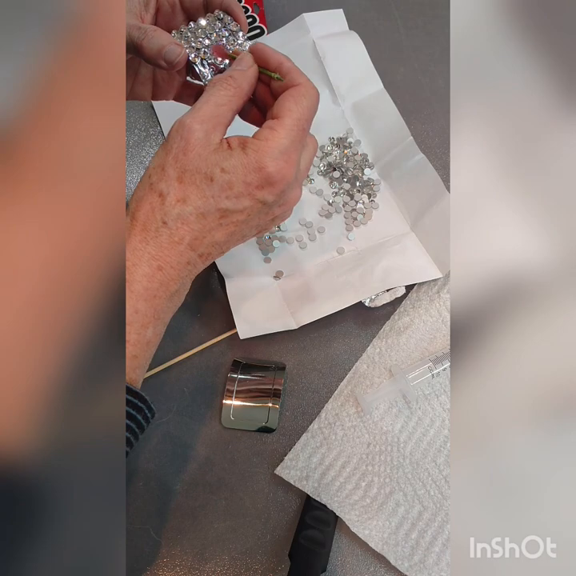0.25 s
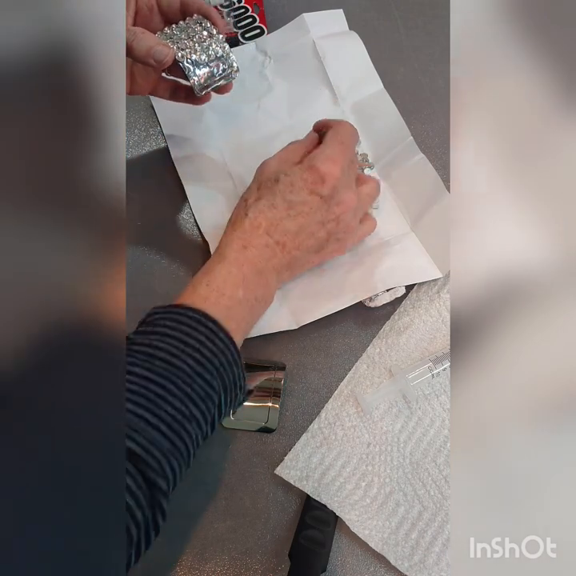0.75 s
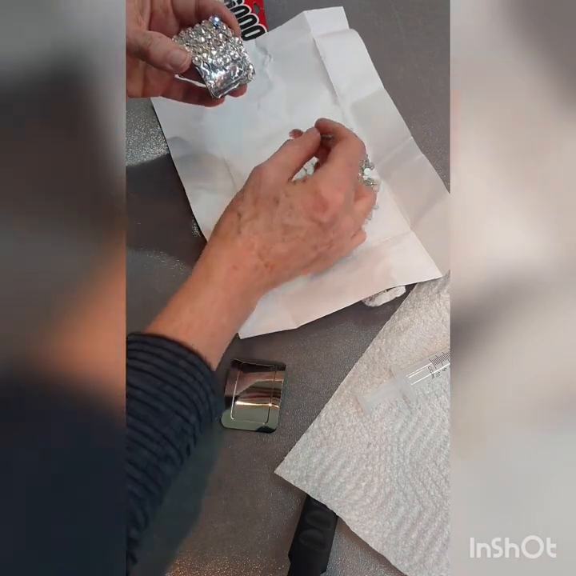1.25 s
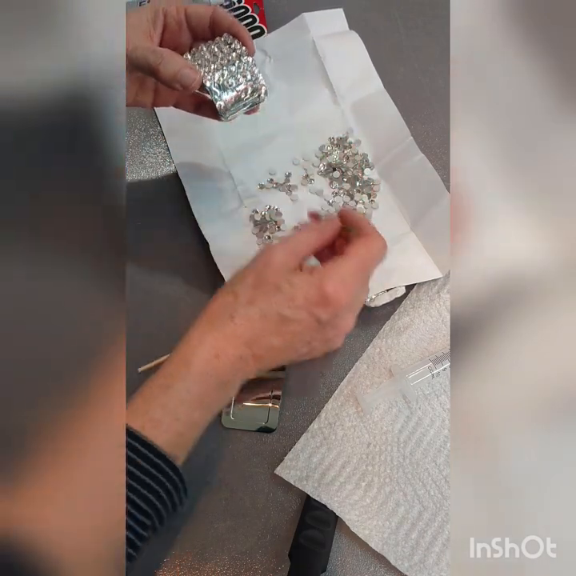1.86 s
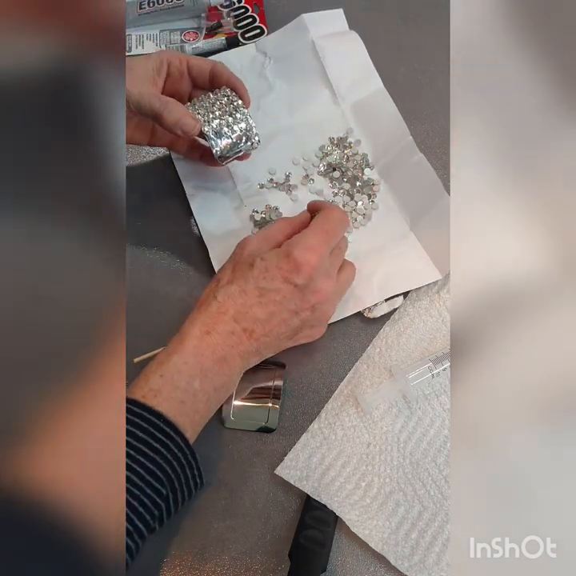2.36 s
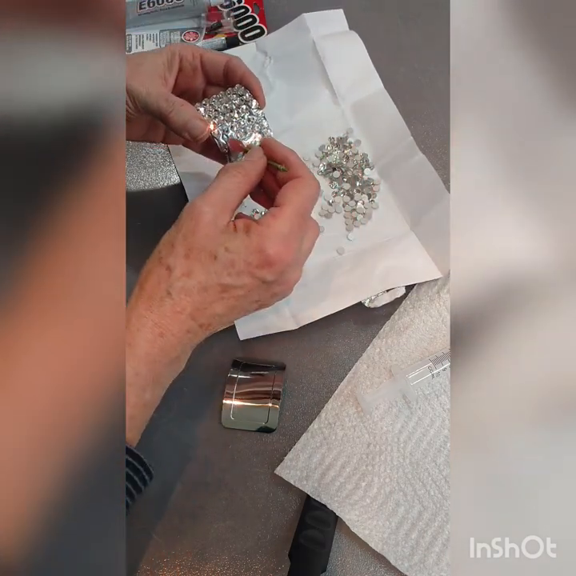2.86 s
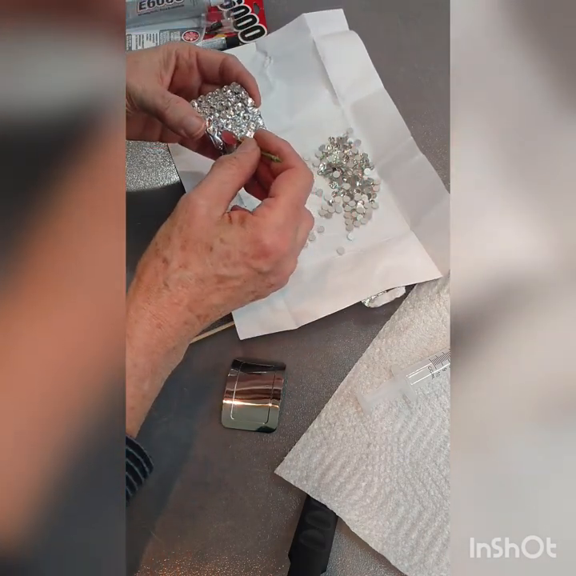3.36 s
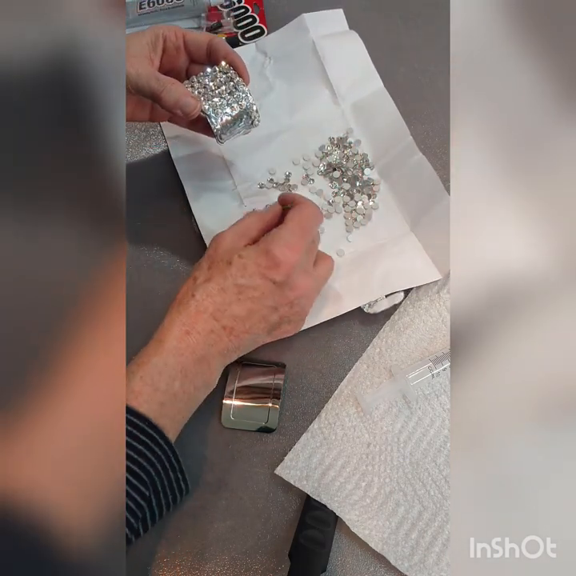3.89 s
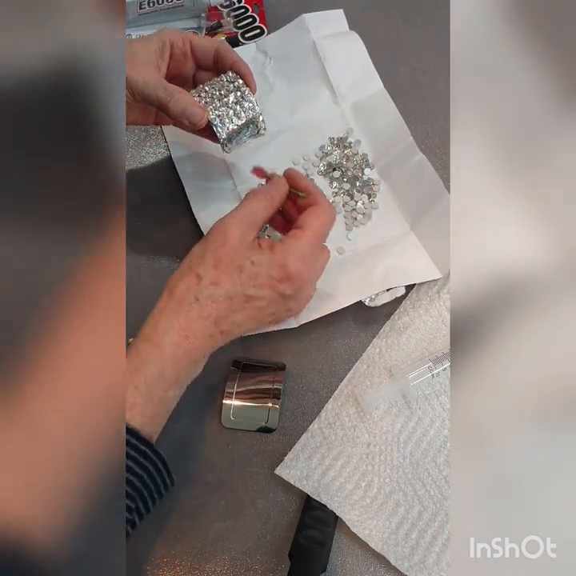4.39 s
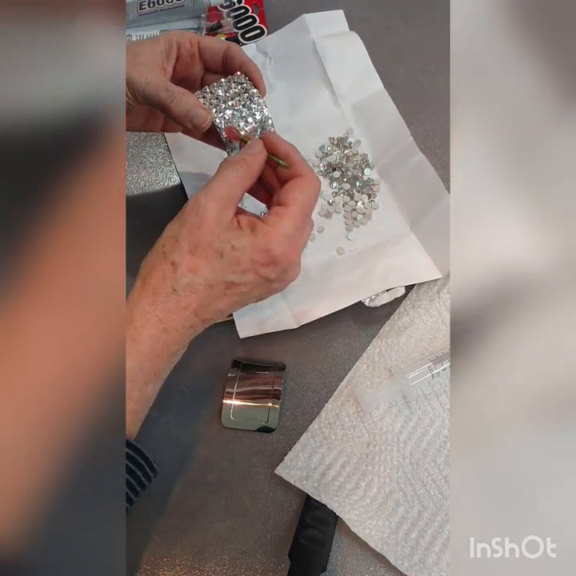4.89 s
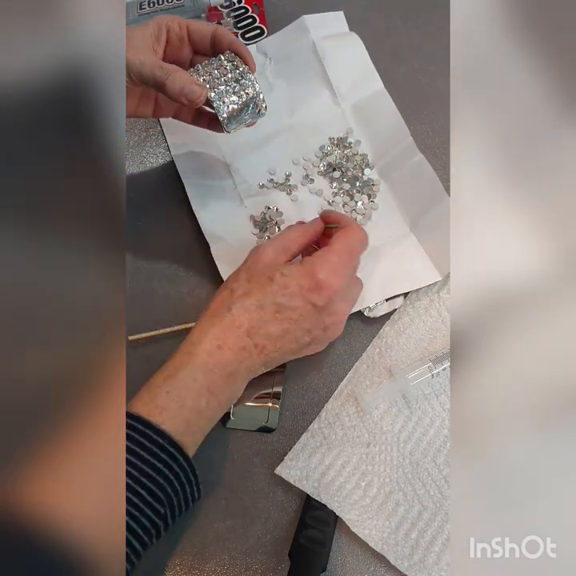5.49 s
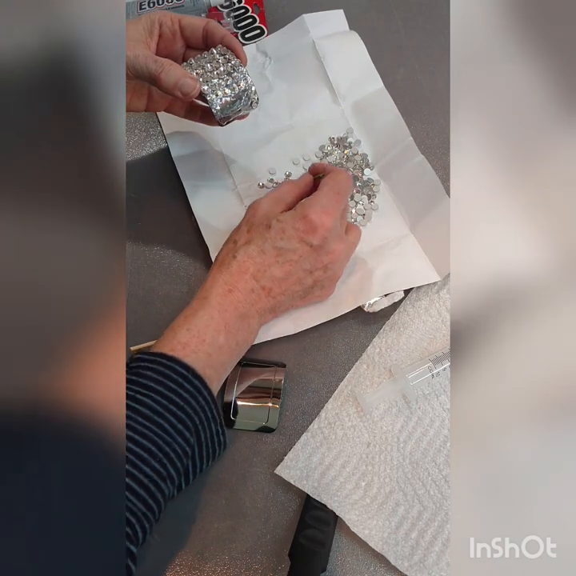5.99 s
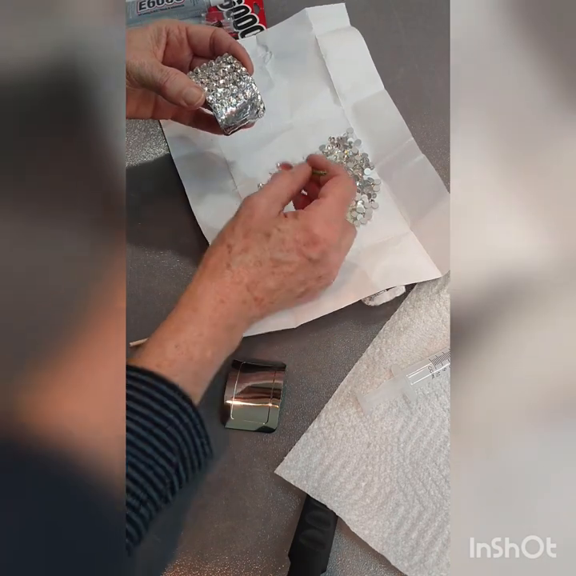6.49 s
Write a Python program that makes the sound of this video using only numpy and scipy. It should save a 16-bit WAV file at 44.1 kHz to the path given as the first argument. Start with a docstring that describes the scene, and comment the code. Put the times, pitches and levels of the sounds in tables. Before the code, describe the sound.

In a quiet room, fingers handle tiny crystals on a paper sheet: crisp clicks, papery rasps and soft thuds in three bouts between lulls.

```python
"""Fingertips pick small glass stones off a creased sheet of paper on a table, close to a phone, in a quiet room.
Throughout: noise shaped as room rumble and hiss, sine hum, and table resonances excited by the moving arm.
From 0.8 s faint ticks and a scrape; 1.5-2.6 s dense snaps and drags; then a lull with two very faint ticks.
From 3.7 s a second handling, and from 5.4 s a third: resonated noise for the sheet, brief sines for the stones.
Last, the phone widens its two capsules by taking from each a delayed copy of the other."""
import sys
import numpy as np
from scipy import signal
from scipy.fft import rfft, irfft
from scipy.io import wavfile
from scipy.ndimage import uniform_filter1d

SR = 44100
rng = np.random.default_rng(int(sys.argv[2]) if len(sys.argv) > 2 else 0)


def waveform_to_disk(signal):
    """Save audio, clipped to [-1, 1], as 16-bit WAV at the path in sys.argv[1]."""
    frames = np.transpose(np.atleast_2d(signal))
    scaled = np.clip(frames, -1, 1) * 32767
    samples = np.round(scaled).astype(np.int16)
    wavfile.write(sys.argv[1], SR, samples)


N = 297234  # samples

# relative noise spectrum of the quiet room: pitch_hz, density_db (per Hz)
ROOM_SPECTRUM = [(25, -35), (45, -6), (90, -2.5), (180, -3), (350, -8), (700, -11.5), (1300, -16.5),
                 (2500, -19.5), (5000, -21), (9000, -24.5), (12500, -29.5), (15500, -35.5)]
# mains-driven hum, mean level in each capsule: pitch_hz, level_db (rms)
HUM_TONES = [(84, -86), (120, -72.5)]
# rumble of the table under the moving arm: start_s, level_db
ARM_RUMBLE = [(0.0, -75), (0.45, -81), (1.07, -69), (1.35, -86), (2.2, -57), (3.0, -73), (3.98, -64),
              (5.14, -74), (5.56, -56), (5.72, -66), (5.9, -60.5), (6.1, -57.5), (6.21, -84), (6.36, -52),
              (6.44, -75), (6.53, -55), (6.65, -70), (6.74, -74)]
# fingers dragging over the sheet, one list for each spell of contact: start_s, level_db,
# weight_db (low body over level)
DRAGS = [
    [(0.81, -82, -3), (0.835, -61.5, -11), (0.98, -69, -13), (1.05, -63.5, 2), (1.09, -70, -10),
     (1.17, -60, -8), (1.255, -60, -11), (1.285, -74, -9)],
    [(1.5, -57, 8), (1.535, -65, -5), (1.585, -55.5, 3), (1.65, -64, 6.5), (1.69, -78, -3)],
    [(1.75, -70, 3), (1.765, -56.5, -1), (1.84, -66, 8), (1.88, -72, 5), (1.9, -61, 4), (1.96, -51, -2.5),
     (2.01, -55, -4), (2.052, -50, -2.5), (2.09, -55.5, 0.5), (2.15, -63, -0.5), (2.19, -55.5, 1),
     (2.23, -61, 2), (2.268, -45.5, -4), (2.29, -65.5, 3.5), (2.35, -64.5, 1.5), (2.385, -56.5, -6),
     (2.41, -60, 3), (2.445, -52.5, 5), (2.5, -60.5, 3.5), (2.55, -75.5, 11)],
    [(3.72, -76, 2), (3.745, -61.5, -3), (3.8, -67.5, -1), (3.82, -62.5, 2), (3.89, -62, 4),
     (3.93, -51, -3.5), (3.955, -52.5, -5), (3.975, -45, -16), (4.0, -46, -27), (4.02, -60.5, 1),
     (4.09, -60.5, 0.5), (4.113, -53, -8.5), (4.14, -58, -3), (4.195, -63.5, -4), (4.24, -52.5, -2.5),
     (4.29, -58.5, -1.5), (4.39, -57.5, -18), (4.42, -72, 9)],
    [(5.44, -80, 7), (5.485, -59, 2), (5.52, -65.5, -4), (5.56, -59.5, -3), (5.62, -58.5, -3),
     (5.68, -53, -9), (5.8, -52, -11), (5.885, -48, -13), (6.03, -49, -16.5), (6.1, -62, -8),
     (6.14, -70, 5)],
    [(6.28, -67, 2), (6.298, -46.5, -9), (6.33, -54.5, -2), (6.348, -41.5, -2), (6.39, -54, -0.5),
     (6.44, -57.5, -1), (6.5, -53, -7.5), (6.535, -55, -1.5), (6.56, -66.5, 1)],
]
# snaps of sheet and stones: start_s, peak_db, weight_db (low body), sparkle_db (glassy top),
# tail_db (tail against crack); the last three are relative
SNAPS = [(0.826, -56, -15, -13, -3), (1.0284, -52.5, -3, -8, -3), (1.118, -53, -19, -16, -9),
         (1.4625, -22.5, -5.5, -11, -5.5), (1.5462, -28.5, -9, -13, -9.5), (1.5938, -30.5, -7, -9, -4.5),
         (1.6086, -37, -4, -20, -16), (1.6278, -37.5, -4, -25, -10), (1.6645, -45, -5, -13, -10),
         (1.7666, -45, 1, -1, 2), (1.7766, -29.5, -4, -23, -9.5), (1.791, -41.5, 2, -21, 2),
         (1.8027, -33, 0.5, -10, -3), (1.8086, -37, 6, -24, -19), (1.8918, -44, 0.5, -21, -5),
         (1.9067, -41, -1, -18, -7), (1.928, -48.5, 7.5, -15, -7), (1.9456, -46.5, 6.5, -15, -5),
         (2.0034, -36, 6.5, -7, -4), (2.0576, -33, 8.5, -9, -8), (2.1578, -35, -1.5, -1, -1.5),
         (2.1977, -38.5, -15, -3, -7), (2.2368, -49.5, 8.5, -14, -3.5), (2.261, -38, -5.5, -7, -1),
         (2.3252, -54, -1, -14, -18), (2.417, -46, 2, -14, -11), (2.4211, -25.5, -6, -26, -15),
         (2.4481, -29, 5.5, -30, -5), (2.8783, -71, 15, -9, -8), (3.076, -69.5, 19.5, -10, -9),
         (3.8162, -53.5, 9.5, -3, 0), (3.8294, -40.5, -20, 6, -8), (3.838, -38, -18, -6, -19),
         (3.8541, -21.5, -4.5, -32, -13.5), (3.9774, -46, -26, -21, -9), (4.041, -48.5, 1, -16, -9),
         (4.143, -48.5, -4.5, 0, 2), (4.266, -52, 12, -18, -8), (4.279, -54, 7, -16, -13),
         (5.454, -48.5, 2.5, -18, -2), (5.47, -39, -5, -21, -5), (5.4985, -45.5, 1.5, -29, -4),
         (5.5332, -49, -6, -16, -10), (5.5748, -39.5, 10, -35, -7), (5.734, -42.5, -21, -8, -14),
         (5.8776, -45, -20, 5.5, -3), (6.3071, -38, -0.5, -1, -2.5), (6.357, -28.5, 3.5, -21, -6),
         (6.4557, -53.5, 10.5, -17, -13), (6.47, -60, 16, -17, -16)]
# resonances of the table: pitch_hz, width_hz (of one pass), level_db (relative)
TABLE_MODES = [(88.4, 30, 1), (195, 127, 1.4)]
# soft thud of the sheet: pitch_hz, width_hz (of one pass), level_db (relative)
THUD_MODES = [(483, 403, 8.5), (1134, 840, -0.5)]
# knock of the sheet: pitch_hz, width_hz (of one pass), level_db (relative)
KNOCK_MODES = [(1626, 1000, 0), (2950, 2380, 0)]
# papery rasp of the sheet: pitch_hz, width_hz (of one pass), level_db (relative)
RASP_MODES = [(3890, 1500, 3.5), (5220, 820, 8), (6670, 3700, -1.5)]
# glassy top: pitch_hz, width_hz (of one pass), level_db (relative)
GLASS_MODES = [(7900, 7800, 3.5), (14000, 5200, -48)]

ROOM_DB = -59  # mean rms level in each capsule
BASS_ALIKE_HZ = 150  # here the share of room noise common to both capsules has halved
THROUGH_DB, THROUGH_S = -9.5, 0.0353  # the sheet's thud passes into the table: level, smear
KNOCK_WEIGHT, GLASS_WEIGHT = 0.8, 0.16  # shares of the weight reaching the knock and a drag's glassy top
DRAG_THUD_DB, DRAG_GLASS_DB = -2, -2  # thud over a drag's weight, glass over its level
TICK_THUD_DB = -6  # thud over a tick's weight
STONE_LOW_HZ, STONE_HIGH_HZ = 1570, 9540
STONE_T60_S, STONE_DB = 0.0048, -11.5  # decay time; level against the tick, of the strongest possible mode
CRACK_T60_S, TAIL_T60_S, TAIL_RISE_S = 0.011, 0.084, 0.003
BUILD_S, SHARPEST_S = 0.00075, 0.00025  # build-up time when tail equals crack, and its added floor
CRUMPLE = 0.53  # how much a strong tail slows the build-up
LEAD, PEAK_DELAY = SR // 50, int(0.00059 * SR)  # samples before a crack's peak; peak after start_s
NEAR_DB = 2  # the first capsule is nearer the hands
CROSS_FEED, CROSS_LAG = 0.67, 17  # gain, samples
TOP_HZ = 15500


def undb(db):
    """Logarithmic level: convert dB to an amplitude gain."""
    return 10 ** (np.asarray(db) / 20)


def unit(x):
    """Normalisation of power: scale to rms 1."""
    return x / np.sqrt(np.mean(x ** 2))


def nearness(pair):
    """Level difference with distance: raise the first capsule and lower the second by half each."""
    return pair * undb([[NEAR_DB / 2], [-NEAR_DB / 2]])


def walk(rate_hz):
    """Slow random modulation: random levels, each held 1 / rate_hz, smoothed twice over that time."""
    hold = int(SR / rate_hz)
    steps = np.repeat(rng.standard_normal(N // hold + 1), hold)
    return uniform_filter1d(uniform_filter1d(steps, hold), hold)[:N]


def ring(x, modes):
    """Modal resonance: parallel double-pass peaks of alternating sign; white noise keeps its rms."""
    pulse = np.zeros(4096)
    pulse[0] = 1
    body = 0
    for k, (hz, width_hz, db) in enumerate(modes):
        b, a = signal.iirpeak(hz, hz / width_hz, SR)
        once = signal.lfilter(b, a, pulse)
        body = body + (-1) ** k * undb(db) * signal.lfilter(b, a, once)
    body = body / np.sqrt(np.sum(body ** 2))
    return signal.fftconvolve(x, body[None], axes=1)[:, :N]


def grit(alike, grain_db, lag=2):
    """Granular friction: dense uneven contacts, partly coherent, the second capsule lag samples later."""
    grains = np.repeat(rng.exponential(size=N // 32 + 1), 32)[:N]
    size = uniform_filter1d(undb(grain_db * grains), size=16)
    both, first, second = unit(size) * rng.standard_normal((3, N))
    shared = np.array([both, np.roll(both, lag)])
    own = np.array([first, second])
    return nearness(np.sqrt(alike) * shared + np.sqrt(1 - alike) * own)


def room():
    """Diffuse noise field: rumble partly coherent, hiss nearly incoherent, swelling a little, with hum."""
    hz, db = np.transpose(ROOM_SPECTRUM)
    f = np.maximum(np.arange(N // 2 + 1) * SR / N, 1)
    colour = undb(np.interp(np.log(f), np.log(hz), db)) * np.minimum(f / hz[0], 1)
    both, *own = rfft(rng.standard_normal((3, N)))
    alike = 0.3 / (1 + (f / BASS_ALIKE_HZ) ** 2)
    spectra = (np.sqrt(alike) * both + np.sqrt(1 - alike) * np.array(own)) * colour
    air = unit(irfft(spectra, N)) * undb(ROOM_DB + 0.5 * walk(1.0))
    t = np.arange(N) / SR
    hum = 0
    for hum_hz, hum_db in HUM_TONES:
        peak = np.sqrt(2) * undb(hum_db + 2.0 * walk(7.0))
        hum = hum + peak * np.sin(2 * np.pi * hum_hz * t)
    return air + hum


def table(thud):
    """Structure-borne sound: arm and sheet thud excite a dull rumble, much alike in both capsules."""
    s, db = np.transpose(ARM_RUMBLE)
    arm = undb(np.interp(np.arange(N) / SR, s, db))
    smeared = np.abs(uniform_filter1d(thud ** 2, int(THROUGH_S * SR)))  # abs guards against rounding
    shake = np.sqrt(arm ** 2 + smeared * undb(THROUGH_DB) ** 2)
    return ring(shake * undb(2.0 * walk(21)) * grit(0.9, 0.37, lag=0), TABLE_MODES)


def scrapes():
    """Stick-slip friction: thud, knock, rasp and glass power of drags, throbbing as the grip slips."""
    power, t = np.zeros((4, N)), np.arange(N) / SR
    for drag in DRAGS:
        s, db, weight_db = np.transpose(drag)
        inside = (t >= s[0]) & (t < s[-1])
        bands_db = db + np.array([weight_db + DRAG_THUD_DB, KNOCK_WEIGHT * weight_db, 0 * db,
                                  GLASS_WEIGHT * weight_db + DRAG_GLASS_DB])
        power[:, inside] = [undb(np.interp(t[inside], s, band_db)) ** 2 for band_db in bands_db]
    throb = undb(walk(52) + walk(200))
    return power * throb ** 2


def stones():
    """Damped free vibration: each tick rings five short modes of stone, at random pitches and strengths."""
    out, t = np.zeros((2, N)), np.arange(SR // 20) / SR
    draws = rng.random((len(SNAPS), 3, 5))
    for (s, db, *_), (pitch, strength, lag) in zip(SNAPS, draws):
        hz = STONE_LOW_HZ * (STONE_HIGH_HZ / STONE_LOW_HZ) ** pitch[:, None]
        decay = undb(db + STONE_DB - 60 * t / STONE_T60_S)
        at = int(s * SR)
        for capsule, turn in zip(out, (0, 2.0 * lag[:, None])):  # phase lag in radians
            modes = strength[:, None] * np.sin(2 * np.pi * hz * t - turn) * decay
            capsule[at:at + len(t)] += modes.sum(axis=0)
    return nearness(out)


def ticks():
    """Impulsive release: thud, knock, rasp and glass power build up, crack and tail off as the sheet settles."""
    power, t = np.zeros((4, N)), np.arange(-LEAD, SR // 4) / SR
    before, after = np.minimum(t, 0), np.maximum(t, 0)
    tail = (1 - np.exp(-after / TAIL_RISE_S)) * undb(-60 * after / TAIL_T60_S)
    for s, db, weight_db, sparkle_db, tail_db in SNAPS:
        build_s = BUILD_S * undb(CRUMPLE * tail_db) + SHARPEST_S  # crumply ticks build slower
        crack = np.exp(before / build_s) * undb(-60 * after / CRACK_T60_S)
        shape = crack ** 2 + (undb(tail_db) * tail) ** 2
        bands_db = db + np.array([[weight_db + TICK_THUD_DB], [KNOCK_WEIGHT * weight_db], [0], [sparkle_db]])
        at = int(s * SR) - LEAD + PEAK_DELAY
        power[:, at:at + len(t)] += undb(bands_db) ** 2 * shape
    return power


def sheet(thud, knock, rasp, glass):
    """Forced vibration: ticks and drags shake one sheet, its thud more coherent than its top."""
    low = ring(thud * grit(0.93, 0.59, lag=-1), THUD_MODES)
    middle = ring(knock * grit(0.27, 2.3), KNOCK_MODES)
    paper = ring(rasp * grit(0.25, 0.74), RASP_MODES)
    top = ring(glass * grit(0.03, 0.97), GLASS_MODES)
    return low + middle + paper + top


def scene():
    """Superposition: tick and scrape powers add in each band, then all sources add at both capsules."""
    bands = np.sqrt(ticks() + scrapes())
    return room() + table(bands[0]) + stones() + sheet(*bands)


def record(dry):
    """Comb interference: each channel loses a delayed copy of the other; then a low-pass cuts the top."""
    other = np.pad(dry[::-1], ((0, 0), (CROSS_LAG, 0)))[:, :N]
    wide = dry - CROSS_FEED * other
    low_pass = signal.ellip(10, 0.2, 80, TOP_HZ, fs=SR, output="sos")
    return signal.sosfilt(low_pass, wide)


dry = scene()
out = record(dry)
waveform_to_disk(out)
```